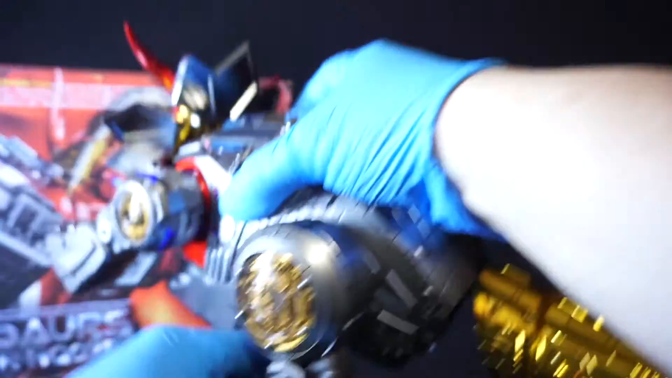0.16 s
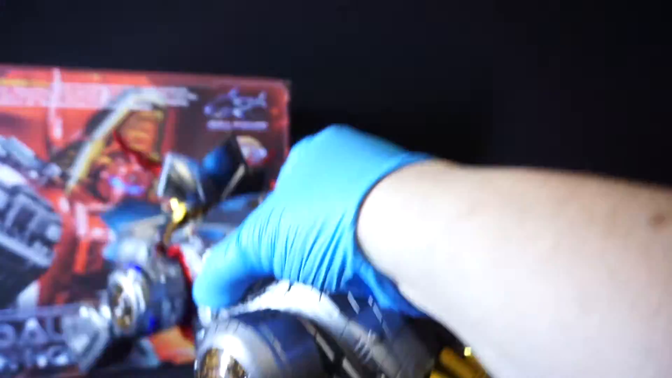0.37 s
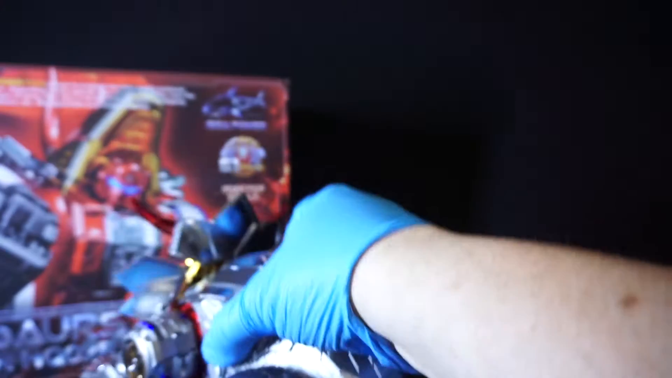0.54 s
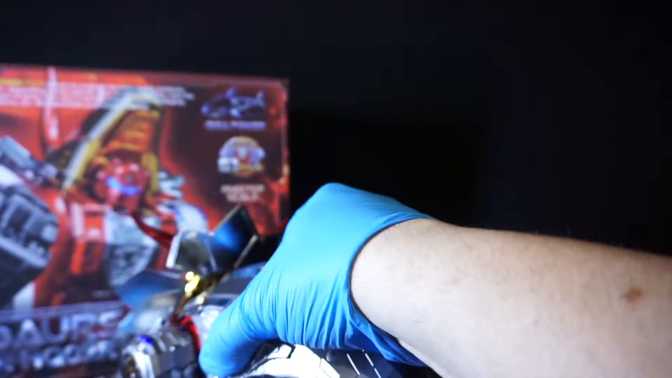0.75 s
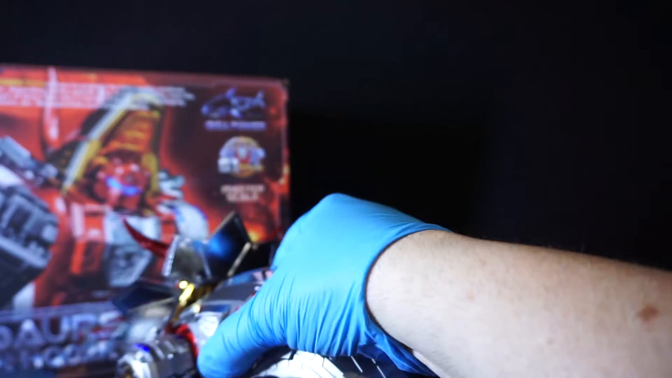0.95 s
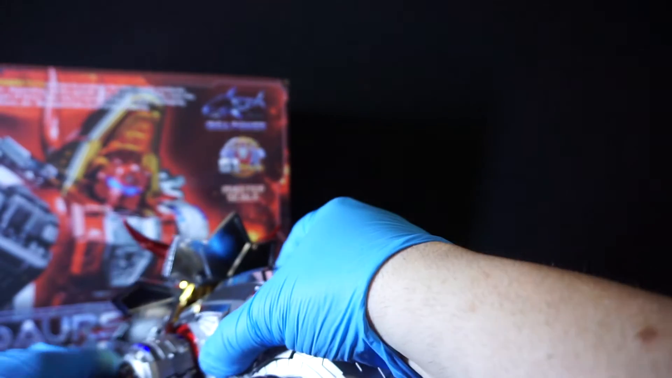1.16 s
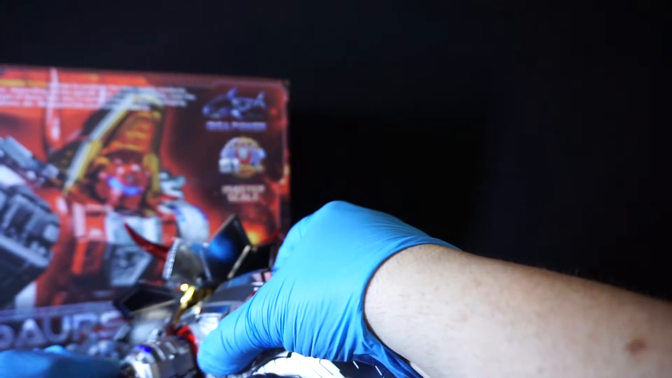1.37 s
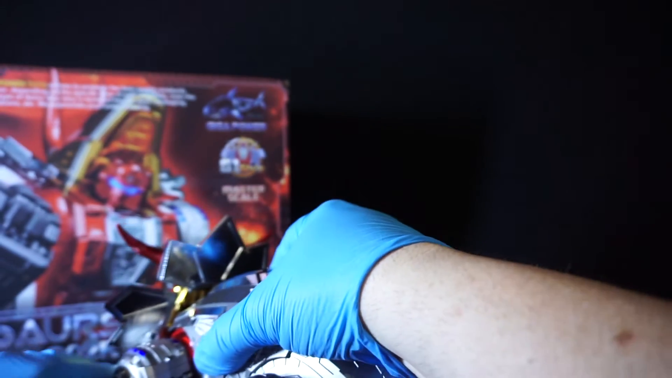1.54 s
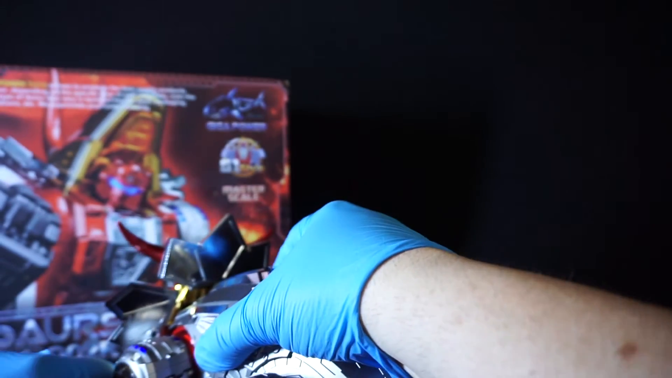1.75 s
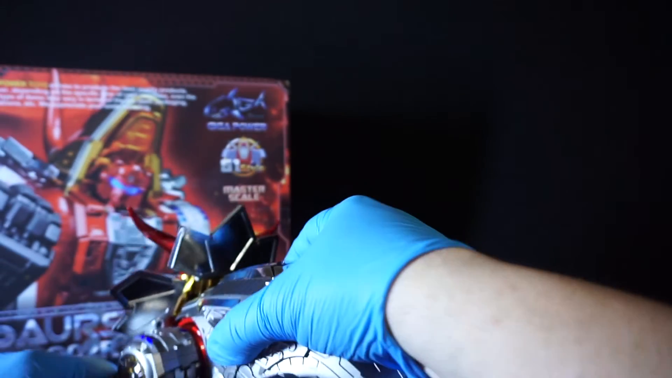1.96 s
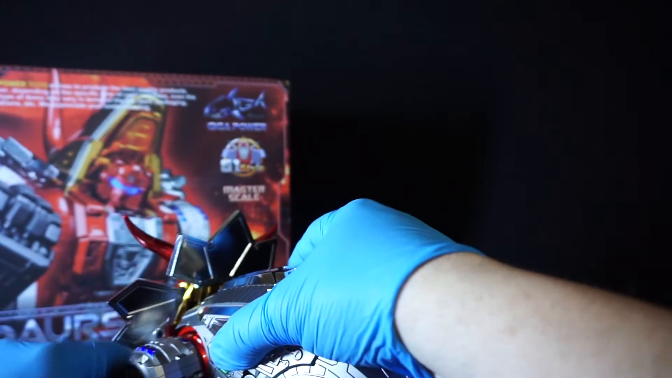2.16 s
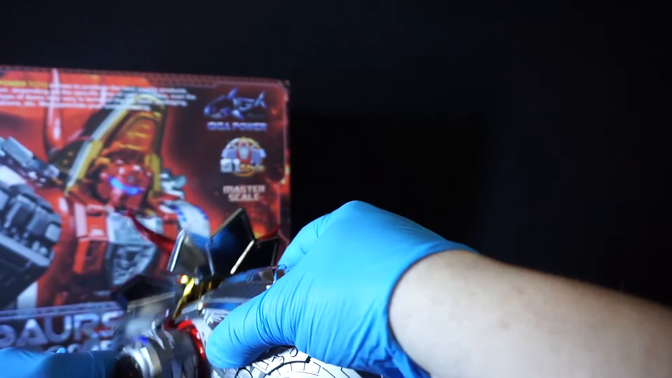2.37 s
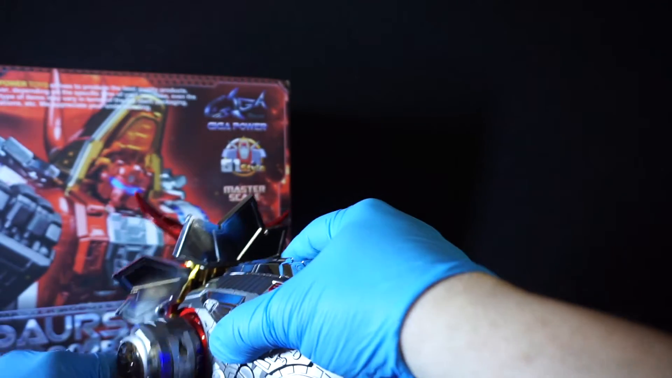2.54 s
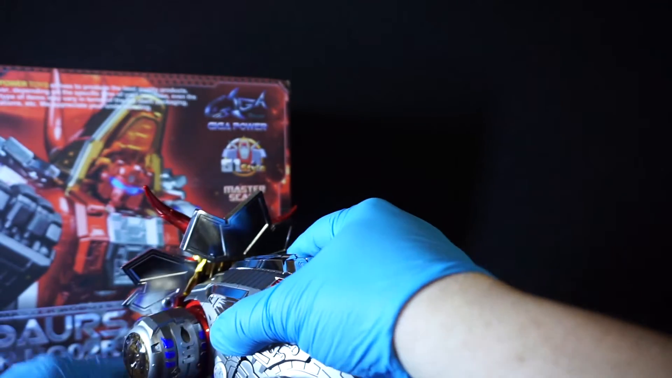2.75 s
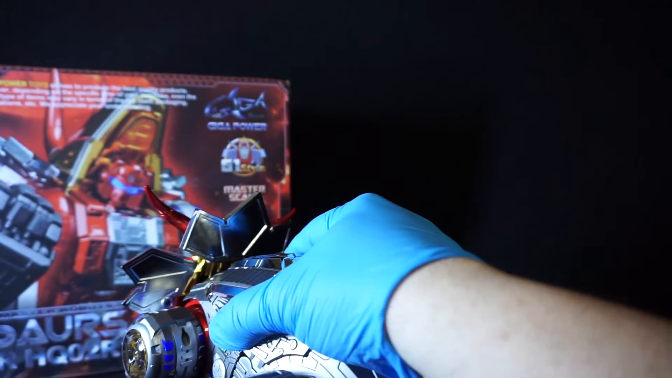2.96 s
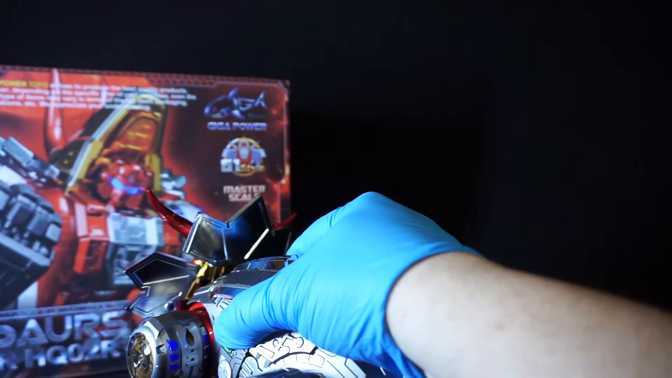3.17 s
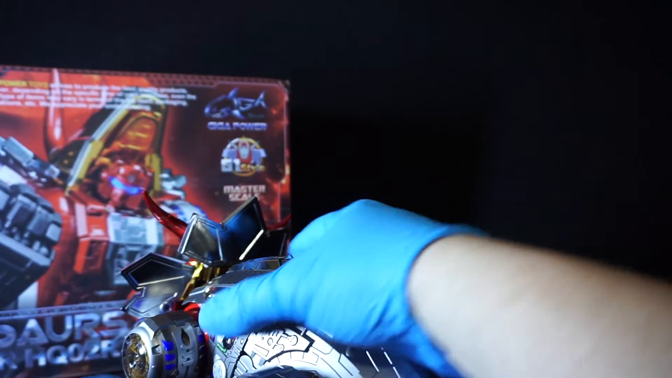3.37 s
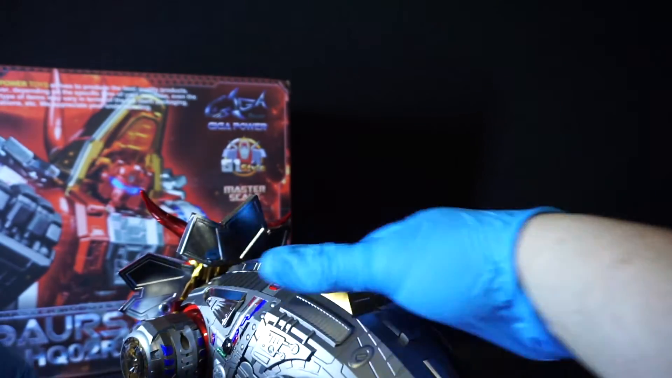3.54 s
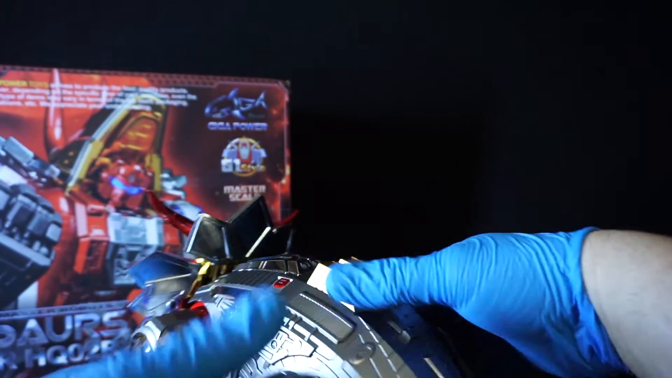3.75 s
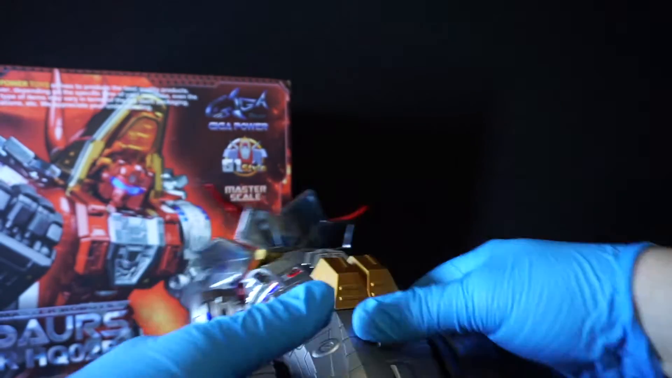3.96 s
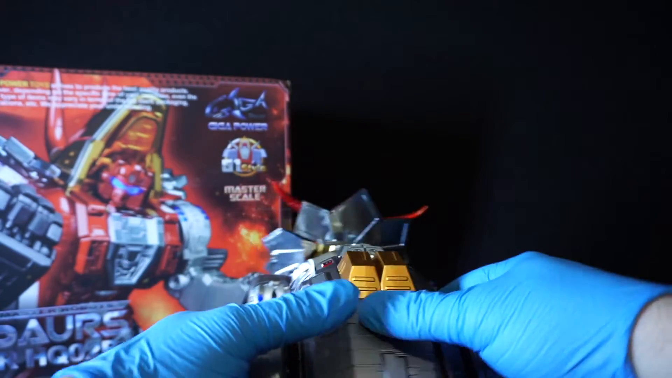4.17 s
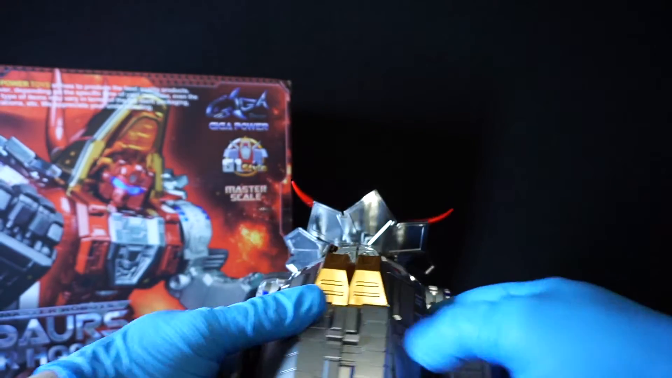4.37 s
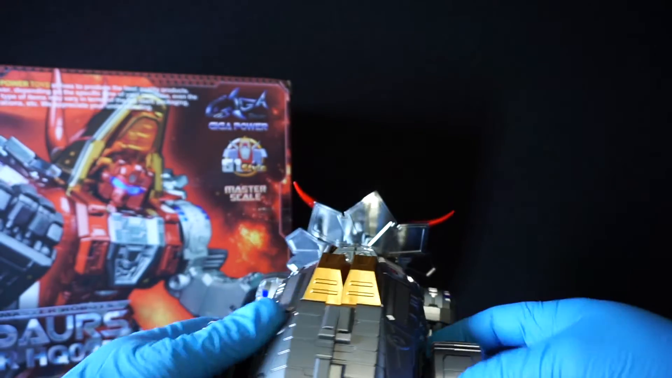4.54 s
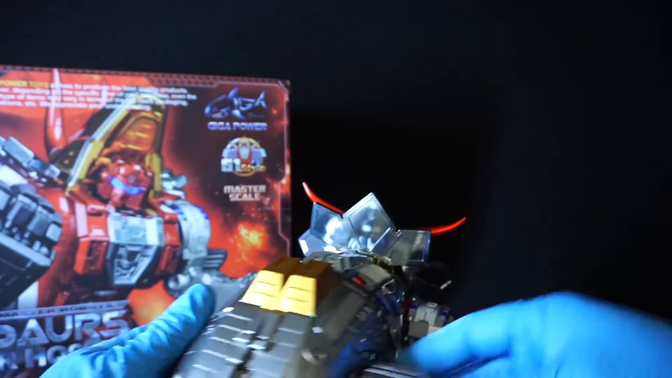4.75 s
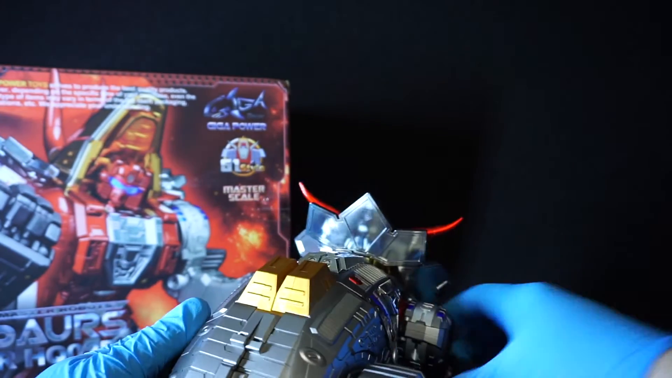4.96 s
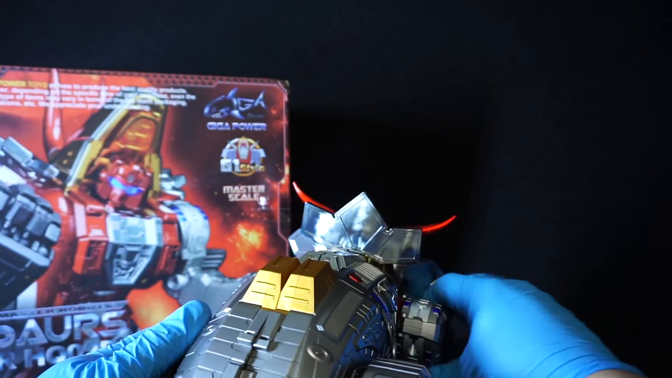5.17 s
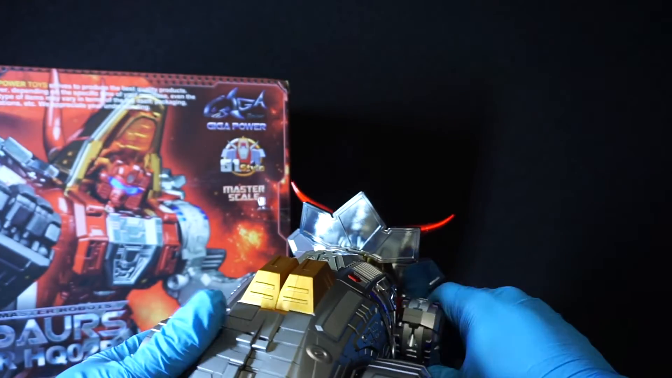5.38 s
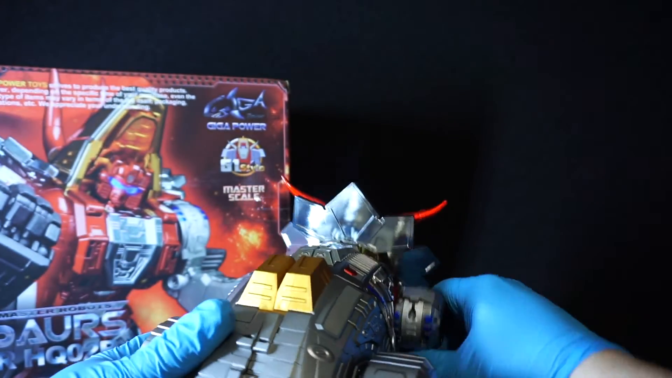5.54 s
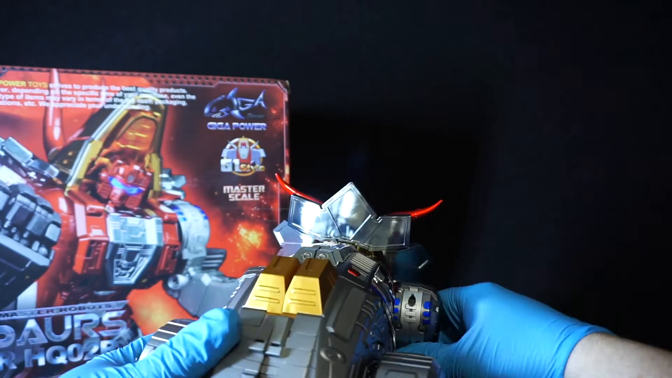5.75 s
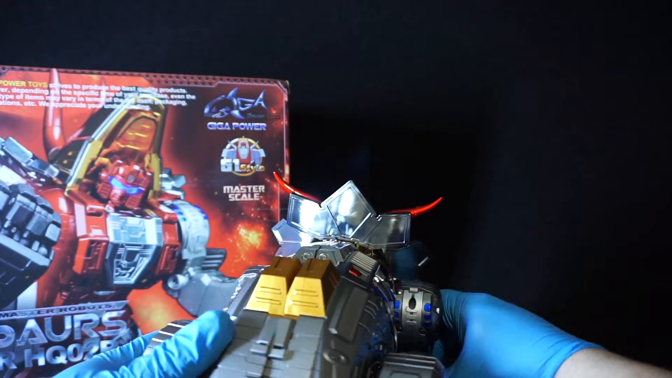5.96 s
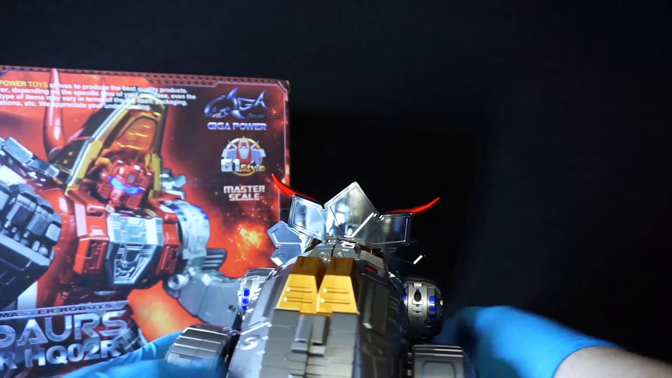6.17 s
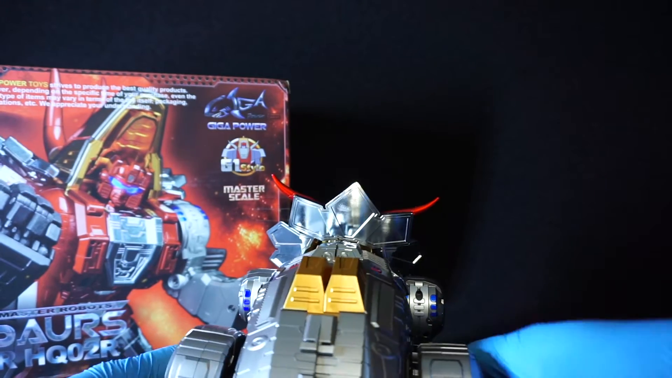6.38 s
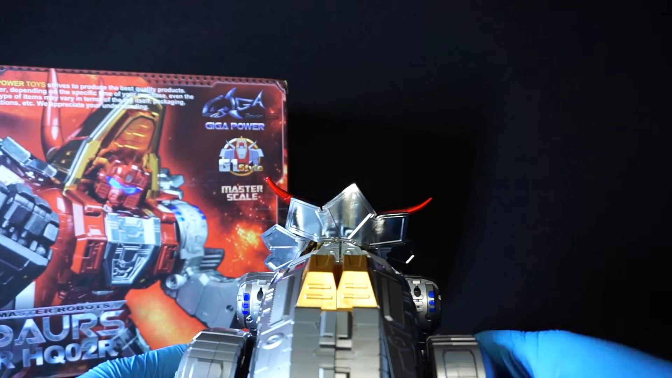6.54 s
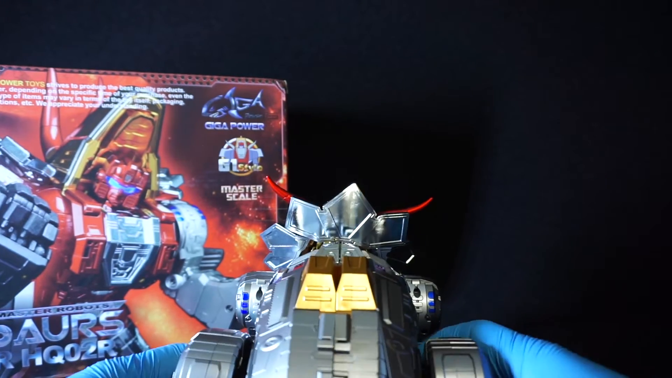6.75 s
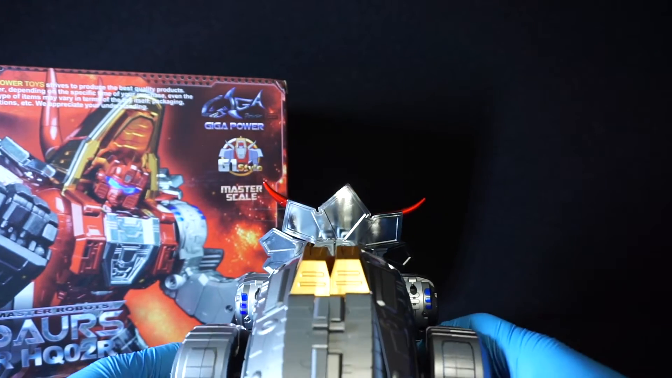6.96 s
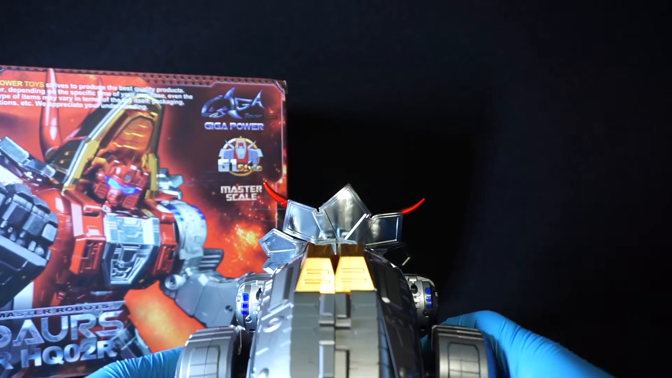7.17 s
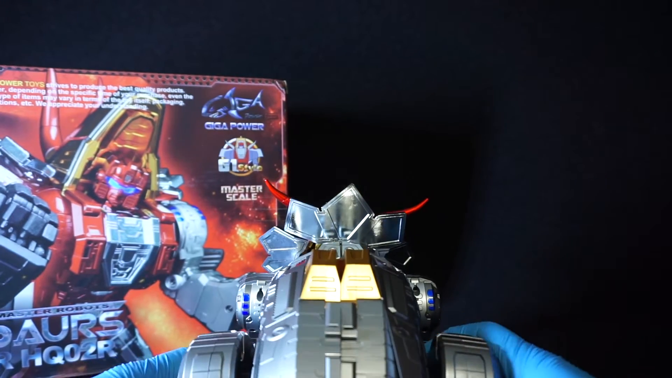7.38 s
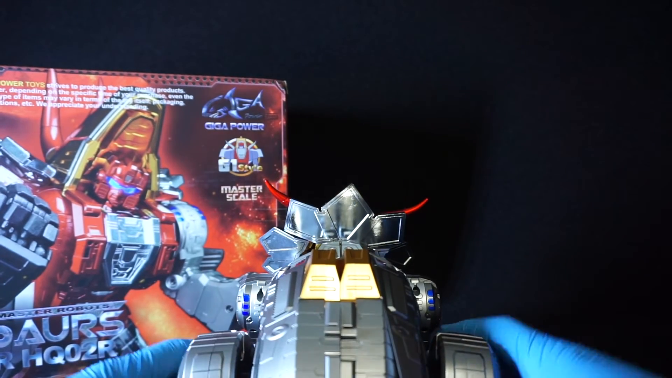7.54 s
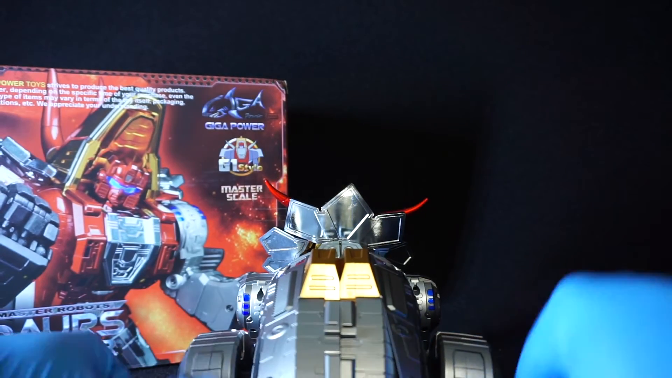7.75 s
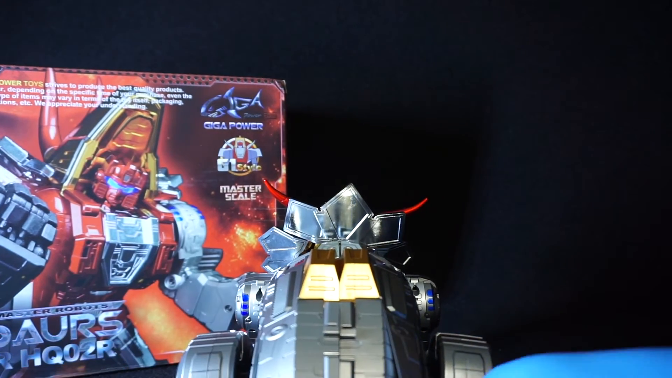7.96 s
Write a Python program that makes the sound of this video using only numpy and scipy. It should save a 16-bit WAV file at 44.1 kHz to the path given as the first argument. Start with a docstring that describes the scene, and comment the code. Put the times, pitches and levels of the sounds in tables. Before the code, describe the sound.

A big toy robot's panels click and clack and its joints ratchet as rubber gloves rub over it on a desk.

```python
"""Posing a toy robot

A large robot of plastic and die-cast metal is handled on a desk in a small room, close to a camera.
Gloves slide over the hollow shell, panels click and clack, two spring ratchet joints turn notch by notch.
The desk booms under the heavier knocks; the camera's limiter ducks everything after the sharpest snaps."""
import sys
import numpy as np
from scipy import signal
from scipy.fft import rfft, irfft, next_fast_len
from scipy.io import wavfile
from scipy.ndimage import uniform_filter1d, minimum_filter1d

SR = 44100
rng = np.random.default_rng(int(sys.argv[2]) if len(sys.argv) > 2 else 0)


def int16_out(signal):
    """Quantize to a 16-bit WAV file."""
    q = np.round(np.clip(np.atleast_2d(signal).T, -1, 1) * 32767)
    wavfile.write(sys.argv[1], SR, q.astype(np.int16))


N = 353241
TIME = np.arange(N) / SR


def amp(db):
    """Decibels to gain."""
    return 10 ** (np.asarray(db) / 20)


def unit_rms(x):
    """Scales to rms 1."""
    return x / np.sqrt(np.mean(x ** 2) + 1e-20)


def unit_hit(x):
    """Scales a stereo hit to the energy of 10 ms at rms 1."""
    return x * np.sqrt(2 * SR / 100 / np.sum(x ** 2))


def curve_at(points, hz):
    """Reads a curve on a log-frequency axis."""
    f, value = np.transpose(points)
    return np.interp(np.log(hz + 1), np.log(f + 1), value)


def add(mix, s, sound):
    """Mixes a sound in at s seconds."""
    part = mix[:, round(s * SR):][:, :sound.shape[1]]
    part += sound[:, :part.shape[1]]


def colour(x, spectrum, size=4096):
    """Minimum-phase EQ: it rings only after it is hit."""
    log_gain = np.log(amp(curve_at(spectrum, abs(np.fft.fftfreq(size, 1 / SR)))))
    taps = np.fft.ifft(np.exp(np.conj(signal.hilbert(log_gain)))).real[:size // 2]
    return signal.fftconvolve(x, taps[None], axes=1)[:, :x.shape[1]]


def pitched(shape, hz):
    """Moves a spectrum to a part's own pitch: small parts ring higher."""
    return [(ratio * hz, db) for ratio, db in shape]


# How alike the two microphone ports sound: (frequency [Hz], coherence [0-1])
PORT_COHERENCE = [(100, 0.97), (700, 0.67), (2000, 0.59), (4000, 0.34), (8000, 0.01), (16000, 0.32)]

def noise(size, lead_s=.00004):
    """Stereo white noise at the two ports: alike in the bass, the left slightly early."""
    padded = next_fast_len(size)
    hz = np.fft.rfftfreq(padded, 1 / SR)
    left, unrelated = rfft(rng.standard_normal((2, size)), padded)
    same = np.clip(curve_at(PORT_COHERENCE, hz), 0, 1)
    right = (same * left + np.sqrt(1 - same ** 2) * unrelated) * np.exp(-2j * np.pi * hz * lead_s)
    return irfft(np.array([left, right]), padded)[:, :size]


def ring(spectrum, t60, hold=0., size=4096):
    """A struck part: crowded modes that chatter for a moment, then die together."""
    decay = amp(-60 * np.maximum(TIME[:size] - hold, 0) / t60)
    return unit_hit(colour(noise(size) * decay, spectrum))


def modes(table, t, detune=0.):
    """Separate resonances: dying sines of random phase."""
    return sum(amp(db - 60 * t / t60) * np.sin(2 * np.pi * (hz * rng.normal(1, detune) * t + rng.random()))
               for hz, db, t60 in table)


# The bed under everything: (frequency [Hz], gain [dB])
ROOM_TONE_EQ = [(20, -12), (45, 2), (70, 2), (95, -7), (135, 5.5), (200, -2), (320, -12), (500, -29),
                (900, -27.5), (1500, -25), (5000, -11), (16000, -17.5)]

def room_tone(level_db=-63.5):
    """The quiet room: a steady low rumble with faint hiss."""
    return amp(level_db) * unit_rms(colour(noise(N), ROOM_TONE_EQ))


# Reverb length: (frequency [Hz], t60 [s])
ROOM_DECAY = [(150, 0.72), (700, 0.26), (2000, 0.3), (4000, 0.29), (9000, 0.24), (16000, 0.17)]
# Soft furnishings swallow some treble from the tail: (frequency [Hz], gain [dB])
TAIL_EQ = [(100, -1), (2500, 0), (6000, -2.5), (16000, 0.5)]

def room_reverb(x, echo_s=.0072, echo_db=-19.5, tail_db=-3.0, build_s=0.0013, size=22050, count=3):
    """One reflection off a near surface, then a short diffuse tail whose paths change as the toy moves."""
    out = x.copy()
    for k in range(count):
        hz, t, bands = signal.stft(noise(size), SR, nperseg=256)
        decay = amp(-60 * t / curve_at(ROOM_DECAY, hz)[:, None])
        tail = signal.istft(bands * decay, SR, nperseg=256)[1][:, :size]
        tail *= 1 - np.exp(-(TIME[:size] / build_s) ** 2)
        tail = colour(tail * amp(tail_db) / np.linalg.norm(tail[0]), TAIL_EQ)
        send = np.sqrt(2 / count) * np.cos(np.pi * (4.3 * TIME + k / count))
        out += signal.fftconvolve(x * send, tail, axes=1)[:, :N]
    add(out, echo_s, amp(echo_db) * x)
    return out


# A thud, all bottom end: (frequency [Hz], gain [dB])
THUD_EQ = [(15, -10), (40, 9), (110, 10), (200, -15), (400, -34), (1000, -54)]

def thud():
    """Weight shifting on the desk: a short low push, in mono."""
    return ring(THUD_EQ, t60=0.24).mean(0, keepdims=True)


# The desk's boom: (frequency [Hz], relative level [dB], t60 [s])
DESK_MODES = [(64.4, -21, 0.23), (112.5, -12, 0.49), (140.5, 0, 0.35), (169, -19, 0.19), (235, -11, 0.31)]
# The torso's dull knock: (frequency [Hz], gain [dB])
TORSO_EQ = [(120, -2), (230, -0.5), (400, 5), (480, -6), (800, -34), (2000, -68)]
# The toy bumps the desk: (time [s], boom before its boost [dB], torso knock [dB])
DESK_BUMPS = [(1.109, -40.5, -36), (1.184, -59, -41.5), (1.776, -51, -49), (2.15, -50, -45),
              (3.106, -37.5, -39), (3.71, -42, -59), (3.882, -60, -47.5), (4.56, -43, -69),
              (4.659, -51, -66), (4.968, -47, -52), (5.25, -53, -48), (6.343, -46.5, -70),
              (6.511, -52.5, -65), (6.81, -47, -56), (6.928, -54.5, -52.5), (7.289, -49.5, -64),
              (7.639, -46, -61), (7.94, -64, -49.5)]
# The toy shifts its weight: (time [s], level [dB])
WEIGHT_SHIFTS = [(0.59, -42), (3.709, -43), (5.247, -48), (7.66, -46)]

def desk(rise_s=0.0075, boost_db=3, rocks_above_db=-28, lurch_lead_s=.014, lurch_db=-43.5, size=22050):
    """Bumps and hard snaps knock the torso and swell the desk's modes; shifts and lurches only thud."""
    t, out = TIME[:size], np.zeros((2, N))
    hard_snaps = [(s, shell_level(db) - 4.5, shell_level(db) - 19)
                  for s, db, _, _ in SNAPS if db > rocks_above_db]
    for s, boom_db, knock_db in DESK_BUMPS + hard_snaps:
        boom = modes(DESK_MODES, t, detune=0.022) * (1 - np.exp(-t / rise_s))
        add(out, s, amp(boom_db + boost_db) * unit_hit(np.array([boom, boom])))
        add(out, s, amp(knock_db) * ring(TORSO_EQ, t60=0.23, size=size))
    for s, db in WEIGHT_SHIFTS:
        add(out, s, amp(db) * thud())
    for s, _, joint in RATCHET_NOTCHES:
        if joint == 1:  # the second joint lurches just before each notch
            add(out, s - lurch_lead_s, amp(lurch_db) * thud())
    return out


def friction(per_s, spread_db, smooth, grain_s=0.00023):
    """Tiny slips of uneven size over a smooth hiss."""
    slips = (rng.random(N) < per_s / SR) * amp(spread_db * np.minimum(rng.exponential(1, N), 4))
    grains = signal.lfilter([1], [1, -np.exp(-1 / (grain_s * SR))], slips)
    return unit_rms(noise(N) * (smooth + unit_rms(grains)))


# Firmness of the grip, riding the murmur, rumble and rattles: (time [s], level [dB])
GRIP_FIRMNESS = [(0, -56.5), (.2, -64), (.7, -57), (1.05, -62), (1.35, -53), (1.7, -56.5), (2.3, -51.5),
                 (2.8, -64), (3.3, -54.5), (3.55, -64.5), (4.7, -60), (5.3, -56.5), (5.9, -70.5),
                 (6.45, -65.5), (6.7, -67), (7.15, -63), (7.7, -62.5), (8, -62)]
# Glove strokes, before the trims: (start [s], length [s], hiss [dB], murmur [dB], swell over stroke [dB])
GLOVE_STROKES = [(0.367, 0.1, -47, -52.5, -1), (0.809, 0.15, -41, -59, -6.5), (1.764, 0.17, -40, -42, 7),
                 (2.087, 0.11, -47, -41.5, -12), (2.62, 0.24, -46, -62, 3), (3.593, 0.11, -51.5, -79, 0),
                 (3.755, 0.2, -41, -50, -2.5), (3.971, 0.52, -44, -59, 4.5),
                 (4.556, .23, -36.5, -50.5, 6.5), (5.02, 0.063, -43.5, -51, 4),
                 (5.346, 0.55, -36, -58, -28), (5.915, .05, -36, -54, 4), (6.018, 0.19, -47.5, -61, 4.5),
                 (6.327, 0.2, -49.5, -57.5, 0), (6.832, .1, -59, -67, 4), (7.39, 0.23, -50.5, -80, 9),
                 (7.62, 0.1, -42, -61, -4), (7.746, 0.13, -44.5, -86, 9)]
# Shell murmur, rubber hiss and the held toy's rumble on the desk: (frequency [Hz], gain [dB])
MURMUR_EQ = [(150, -24.5), (350, -18), (580, -9.5), (780, -2), (900, -5), (1150, -13), (1800, -11),
             (4000, -19)]
RUBBER_EQ = [(400, -10.5), (1400, -21), (2400, -4), (3600, 1), (5200, 2), (8000, -0.5), (12000, -1),
             (16000, -4.5)]
RUMBLE_EQ = [(25, -4), (65, -2.5), (95, -0.5), (138, 5.5), (175, -3), (260, -0.5), (400, -7),
             (700, -18), (2000, -55)]

def gloves(murmur_trim_db=-1.0, hiss_trim_db=-5.0, rumble_trim_db=-2.5,
           attack_s=0.042, release_s=0.048, wander_db=1.5, wander_s=.06):
    """Rubber hisses over the surface, coarser slips murmur in the shell and the held toy rumbles."""
    clock = TIME[::128]
    grip = amp(np.interp(clock, *np.transpose(GRIP_FIRMNESS)))
    murmur, hiss = grip, amp(-60)  # a resting hand still hisses faintly
    for start, length, hiss_db, murmur_db, swell_db in GLOVE_STROKES:
        t = clock - start
        stroke = np.clip(t / attack_s, 0, 1) * np.clip(1 - (t - length) / release_s, 0, 1)
        stroke *= amp(swell_db * (np.clip(t / length, 0, 1) - .5))
        murmur = np.hypot(murmur, amp(murmur_db) * stroke)
        hiss = np.hypot(hiss, amp(hiss_db) * stroke)
    grip, murmur, hiss = [np.interp(TIME, clock, level) for level in (grip, murmur, hiss)]
    pressure = amp(wander_db * np.interp(TIME / wander_s, np.arange(1000), rng.standard_normal(1000)))
    coarse = unit_rms(colour(friction(per_s=260, spread_db=2.5, smooth=.7), MURMUR_EQ))
    fine = unit_rms(colour(friction(per_s=3900, spread_db=-1.0, smooth=1.5), RUBBER_EQ))
    sliding = amp(murmur_trim_db) * murmur * coarse + amp(hiss_trim_db) * hiss * fine
    rumble = amp(rumble_trim_db) * grip * unit_rms(colour(noise(N), RUMBLE_EQ))
    return pressure * sliding + rumble


# Tight parts rubbing: (time [s], length [s], level [dB], pitch [Hz])
SCRAPE_CUES = [(0.859, 0.016, -40, 2300), (1.4, 0.02, -44, 3220), (1.482, 0.067, -55, 2800),
               (1.749, 0.29, -45.5, 4000), (3.801, 0.13, -51, 2780), (4.968, 0.036, -37, 3720),
               (5.937, 0.068, -42.5, 3700), (6.64, 0.069, -60, 3950), (7.19, 0.026, -38, 3100),
               (7.642, 0.43, -53.5, 2260)]
# A scrape's tone: (frequency [x pitch], gain [dB])
SCRAPE_EQ = [(.1, -34), (.27, -10), (.55, -9.5), (1, -3), (1.7, -10.5), (2.4, -16), (6, -12)]

def scrapes(slips_per_s=140, smooth=0.43):
    """A tight part sticks and lets go at a wavering rate as it is pushed home."""
    out, size = np.zeros((2, N)), SR // 2
    for s, length, db, hz in SCRAPE_CUES:
        stroke = np.sqrt(abs(np.sin(np.pi * np.clip(TIME[:size] / length, 0, 1))))
        waver = unit_rms(uniform_filter1d(rng.standard_normal(size), size=300))
        slip_phase = np.cumsum(slips_per_s * np.exp(.4 * waver)) / SR % 1
        slips = smooth + np.exp(-slip_phase / 0.32)
        add(out, s, amp(db) * stroke * unit_rms(colour(noise(size) * slips, pitched(SCRAPE_EQ, hz))))
    return out


def shell_level(force_db, full_force_db=-19.5):
    """The shell's answer to a snap in dB, growing more slowly than the force."""
    return -33.5 + 0.66 * (force_db - full_force_db)


def rattles(per_s=4, scatter_db=1, lowest_hz=2300):
    """Loose parts touch at random, louder under a firm grip; laid out as in contacts()."""
    hits = []
    for slot, (when, strength, pitch) in enumerate(rng.random((round(per_s * N / SR), 3))):
        s = (slot + when) / per_s
        db = np.interp(s, *np.transpose(GRIP_FIRMNESS)) + scatter_db * (2 * strength - 1)
        hits.append((s, db + 1, db - 3.5, db - 18, lowest_hz * 2 ** (pitch / 2)))
    return hits


# Panels and pegs snapping home: (time [s], force [dB], tick offset [dB], clack pitch [Hz])
SNAPS = [(0.2241, -48.5, 13, 3850), (0.2947, -31, -3, 2500), (0.315, -50.5, 14.5, 3000),
         (0.5367, -32, -1.5, 3100), (0.5964, -20, -2.5, 3950), (1.009, -43.5, 2.5, 2900),
         (1.1117, -43.5, -21, 2040), (1.186, -41.5, -17, 2600), (1.2674, -35, -4.5, 2740),
         (1.4035, -35.5, -19, 2720), (1.5106, -42, -28, 2340), (1.7579, -46, 0, 3090),
         (1.7771, -42, 3, 2620), (1.8126, -41.5, 1.5, 2780), (1.8579, -20, -8.5, 2920),
         (1.8866, -15, -12.5, 2730), (2.037, -40.5, 0, 2670), (2.1484, -40, 4.5, 2700),
         (2.2945, -44, 1, 2970), (2.5118, -34, -16, 2380), (2.8754, -45, 0.5, 3700),
         (2.924, -43, 2.5, 3660), (3.0311, -23.5, -11.5, 3830), (3.1049, -21.5, -13, 3700),
         (3.708, -38.5, 0.5, 3370), (4.2342, -55.5, 11, 3940), (4.8209, -38, -20, 1560),
         (4.967, -36, 6, 3600), (5.2506, -38.5, -4.5, 3080), (5.9638, -50.5, 12, 3940),
         (5.9729, -42, 8, 3340), (6.363, -53, 3, 4040), (6.514, -45.5, -19, 2950), (6.854, -54, -1, 3350),
         (6.8812, -48.5, 0, 3400), (6.929, -43.5, -8.5, 2770), (7.1963, -60, 13, 3100),
         (7.6405, -45.5, 4.5, 3700)]
# Dull knocks on the shell, finger taps and extra hollow body under a few snaps: (time [s], level [dB])
SHELL_KNOCKS = [(0.0181, -53), (0.3517, -42.5), (0.5593, -42), (0.7238, -36.5), (0.8297, -45),
                (1.1858, -40), (1.3746, -46.5), (1.6609, -41), (1.7327, -44), (2.129, -40), (2.1849, -40.5),
                (2.2518, -41), (2.2999, -36), (2.381, -36.5), (3.031, -36.5), (3.105, -41.5), (3.3234, -47),
                (3.3526, -49), (3.8811, -38.5), (4.6601, -40.5), (4.9792, -37.5), (5.0161, -40),
                (5.2506, -46.5), (7.2684, -45), (7.3059, -55)]

def contacts(finger_hz=2300):
    """Snaps, soft knocks and rattles as (time [s], shell [dB], clack [dB], tick [dB], pitch [Hz])."""
    snaps = [(s, shell_level(db), db, db + tick_db, hz) for s, db, tick_db, hz in SNAPS]
    knocks = [(s, db, db - 7, db - 14, finger_hz) for s, db in SHELL_KNOCKS]
    return snaps + knocks + rattles()


# The shell's hollow body and the tick's crisp top: (frequency [Hz], gain [dB])
SHELL_EQ = [(300, -10.5), (480, -4), (620, -0.5), (800, 6), (950, -0.5), (1200, -11.5), (1700, -18.5),
            (4000, -42.5)]
TICK_EQ = [(2000, -12), (4400, 4.5), (5500, 4.5), (8000, 8), (11000, 8), (14500, 3.5), (16500, 2)]
# A panel's clack: (frequency [x pitch], gain [dB])
CLACK_EQ = [(.15, -59), (.3, -6.5), (.45, -5.5), (.62, -4), (.85, -2.5), (1.15, -4), (1.5, -4.5),
            (1.95, -11.5), (3.2, -31)]
# The die-cast frame under the panels: (frequency [Hz], relative level [dB], t60 [s])
FRAME_MODES = [(644, -10, 0.13), (983, 4.5, 0.018), (1088, -8, 0.097), (1975, -1.5, 0.045)]

def panels(frame_db=-14.0, tick_boost_db=1.5, bright_per_db=2.1, size=6615):
    """Each contact ticks, rings the panel and the frame, and sounds the hollow shell behind it."""
    out = np.zeros((2, N))
    for s, shell_db, clack_db, tick_db, hz in contacts():
        # a harder blow is a shorter contact, so its clack reaches higher
        lift_db = bright_per_db * np.clip(clack_db + 18.5, 0, 20)
        clack_eq = [(f, db + lift_db * np.clip(np.log2(f / hz) - .5, 0, 1))
                    for f, db in pitched(CLACK_EQ, hz)]
        frame = modes(FRAME_MODES, TIME[:size], detune=0.0087)
        add(out, s, amp(shell_db) * ring(SHELL_EQ, t60=0.066))
        add(out, s, amp(clack_db) * ring(clack_eq, t60=0.016, hold=0.0019))
        add(out, s, amp(clack_db + frame_db) * unit_hit(np.array([frame, frame])))
        add(out, s, amp(tick_db + tick_boost_db) * ring(TICK_EQ, t60=.009, hold=.0008))
    return out


# Notches snapping in: (time [s], force [dB], joint [0 or 1])
RATCHET_NOTCHES = [(2.4003, -11.5, 0), (2.432, -8.5, 0), (2.5627, -12, 0), (2.6128, -10.5, 0),
                   (5.3562, -8, 1), (5.4312, -10, 1), (5.5472, -15.5, 1), (5.5928, -15.5, 1),
                   (5.6714, -14, 1)]
# Each joint's metallic bite: (frequency [Hz], gain [dB])
FIRST_JOINT_EQ = [(300, -39), (800, -22), (1400, -23.5), (2300, -22.5), (3000, -7.5), (3700, 1.5),
                  (4400, -6), (5400, -8.5), (7000, -3), (8000, -4), (10300, -2.5), (12500, -1),
                  (14300, 0.3), (16000, -7)]
SECOND_JOINT_EQ = [(300, -40), (800, -11), (1400, -22), (2300, -18.5), (3000, -5.5), (3650, 5),
                   (4400, -5.5), (5700, -2.5), (7500, -6.5), (9200, 4.5), (10700, 6), (12500, 1),
                   (14500, 2.5), (16000, -12.5)]
# The springs' lingering shimmer: (frequency [Hz], relative level [dB], t60 [s])
SPRING_MODES = [(3760, -9, 0.32), (8900, -7, 0.35), (9250, -9, .4), (10000, 4, 0.49), (10680, -2, 0.56),
                (11700, 12, 0.32), (14200, -11, .3), (14300, -4, 0.28)]

def ratchets(sing_db=-0.5, sing_t60=0.29, sing_rise_s=0.0054, spring_db=-21.0,
             reflection_s=.0073, reflection_db=-7.5, size=22050):
    """Each notch snaps and reflects off a near surface 7 ms later; the metal and its spring sing on."""
    joints = [(FIRST_JOINT_EQ, amp([[.4], [-.4]])), (SECOND_JOINT_EQ, amp([[-1.3], [1.3]]))]
    swell = 1 - np.exp(-TIME[:size] / sing_rise_s)
    out = np.zeros((2, N))
    for s, force_db, joint in RATCHET_NOTCHES:
        joint_eq, pan = joints[joint]
        force = amp(force_db) * pan
        add(out, s, force * ring(joint_eq, t60=0.012, hold=0.0019))
        add(out, s + reflection_s, force * amp(reflection_db) * ring(joint_eq, t60=0.0048, hold=0.00091))
        add(out, s, force * amp(sing_db) * swell * ring(joint_eq, t60=sing_t60, size=size))
        spring = np.array([modes(SPRING_MODES, TIME[:size]) for port in range(2)])
        add(out, s, force * amp(spring_db) * unit_hit(spring))
    return out


# Where the hands work: (time [s], left minus right [dB])
HAND_PAN = [(0, 0.5), (.6, -1), (1.2, 1), (3.1, 0), (3.8, -1), (5, -1.5), (7.2, -1), (8, -2)]

def scene(direct_db=-5.0):
    """The mix: handling panned with the hands and ratchets in the room, over the desk and room tone."""
    side_db = np.interp(TIME, *np.transpose(HAND_PAN))
    handling = (panels() + scrapes() + gloves()) * amp(np.array([side_db, -side_db]) / 2)
    bed = room_tone()
    joints = ratchets()
    # the joints face the microphone, so more of their sound arrives direct
    return room_reverb(handling + joints) + amp(direct_db) * joints + desk() + bed


def record(dry, ceiling_db=-7.0, release_s=0.091, cutoff_hz=16100):
    """A look-ahead limiter catches the snaps and recovers slowly; a low-pass then trims the very top."""
    peak = -minimum_filter1d(-abs(dry).max(0), size=96)
    over_db = np.maximum(20 * np.log10(peak + 1e-9) - ceiling_db, 1e-6)
    # gain reduction jumps to each overshoot, then decays exponentially
    reduction_db = np.exp(np.maximum.accumulate(np.log(over_db) + TIME / release_s) - TIME / release_s)
    limited = dry * amp(-uniform_filter1d(reduction_db, size=48))
    low_pass = signal.firwin(255, cutoff_hz, window=("kaiser", 9), fs=SR)
    return signal.oaconvolve(limited, low_pass[None], "same", axes=1)


dry = scene()
out = record(dry)
int16_out(out)
```